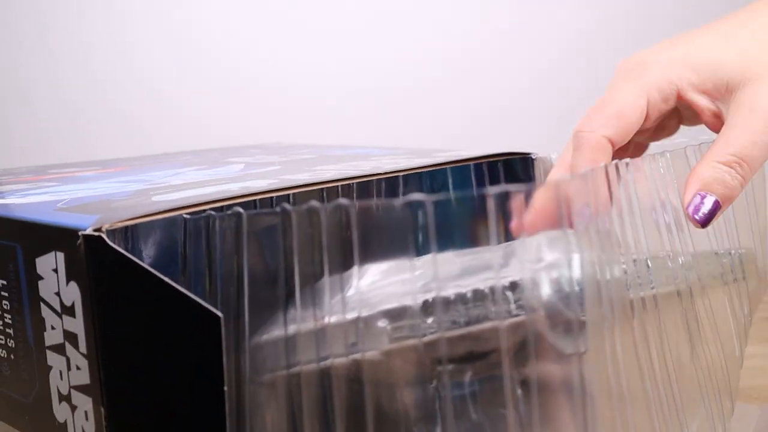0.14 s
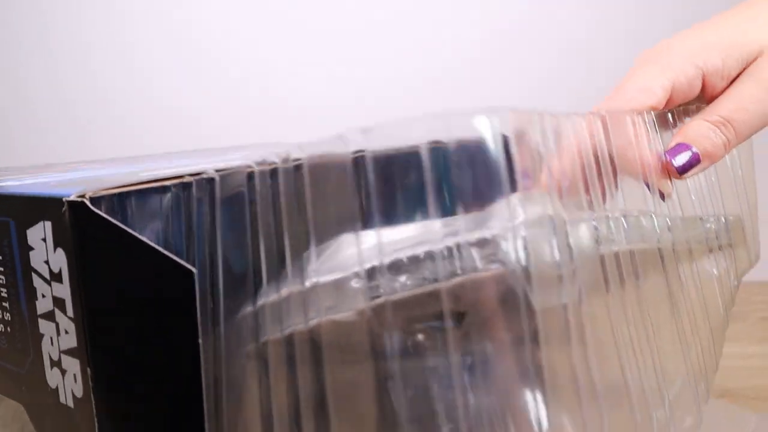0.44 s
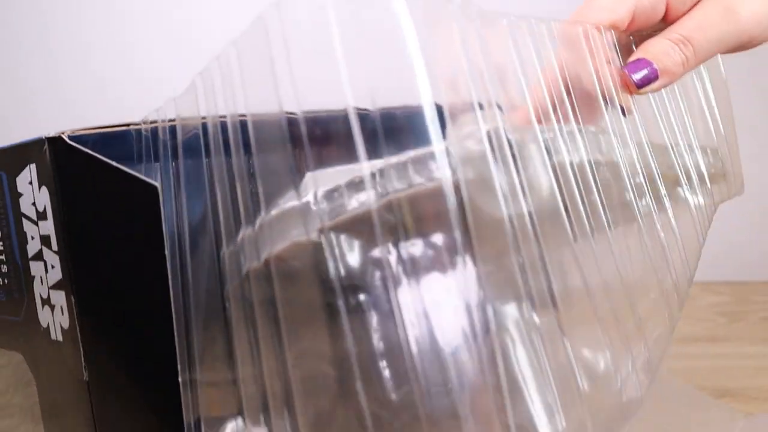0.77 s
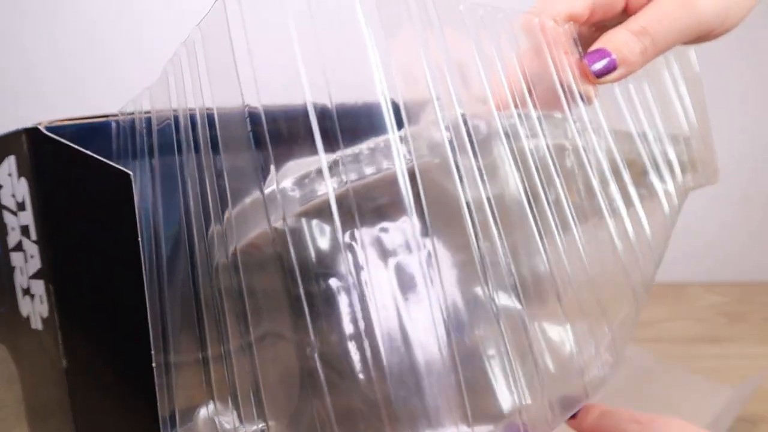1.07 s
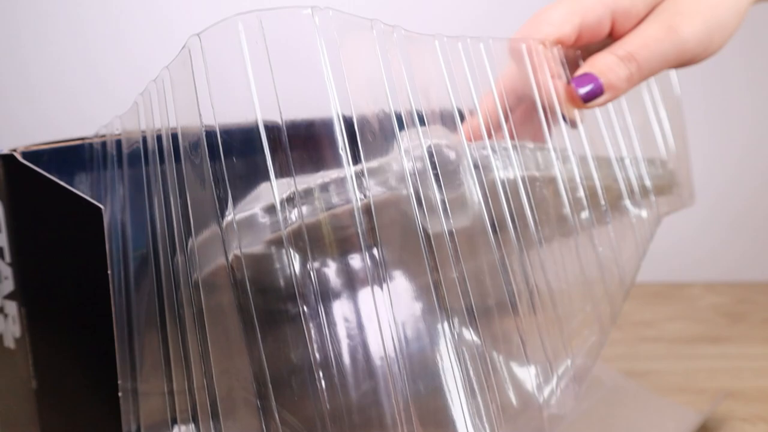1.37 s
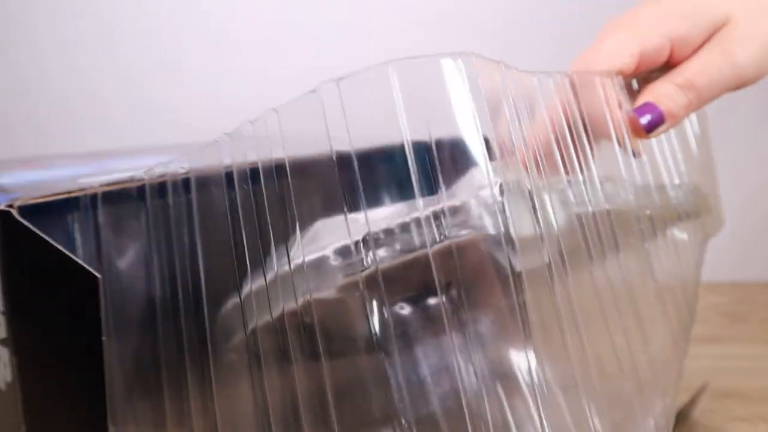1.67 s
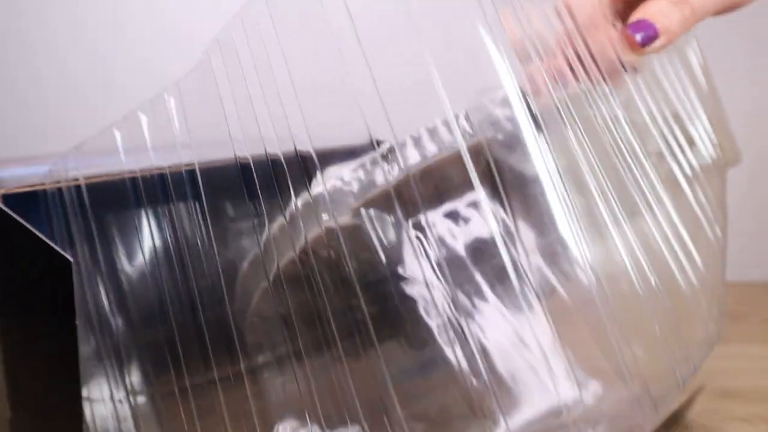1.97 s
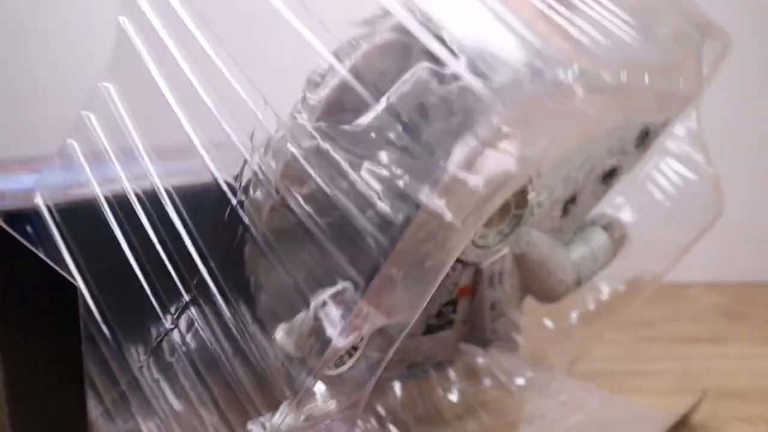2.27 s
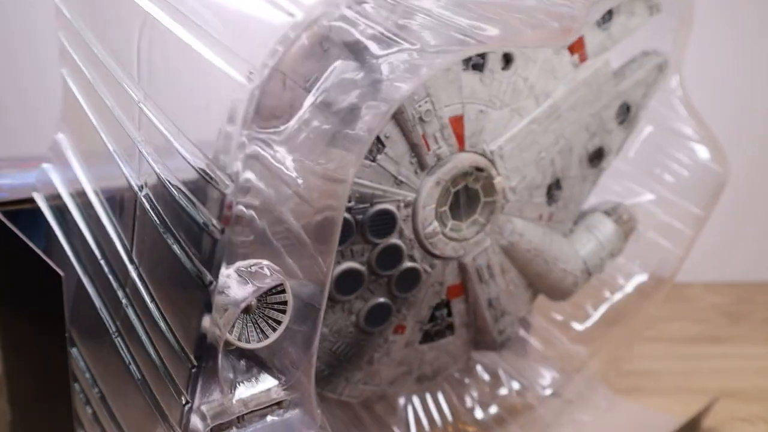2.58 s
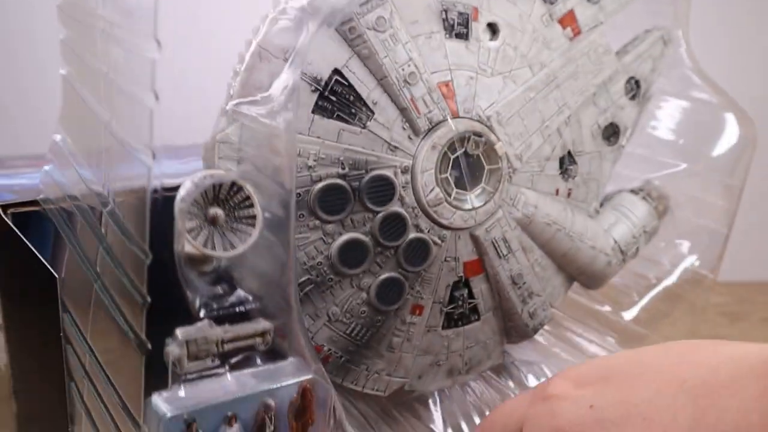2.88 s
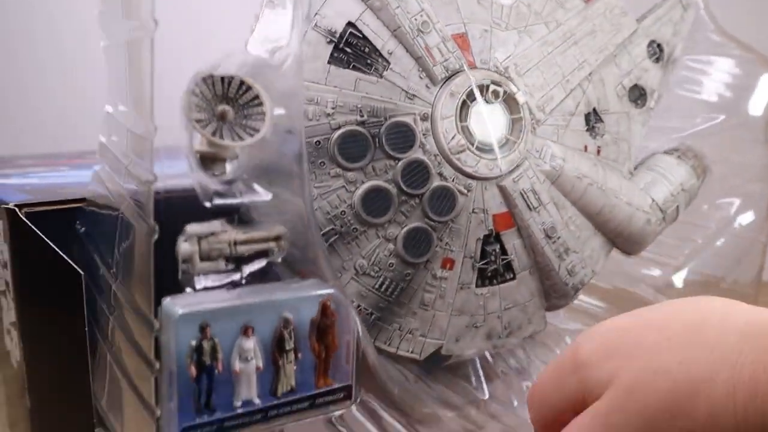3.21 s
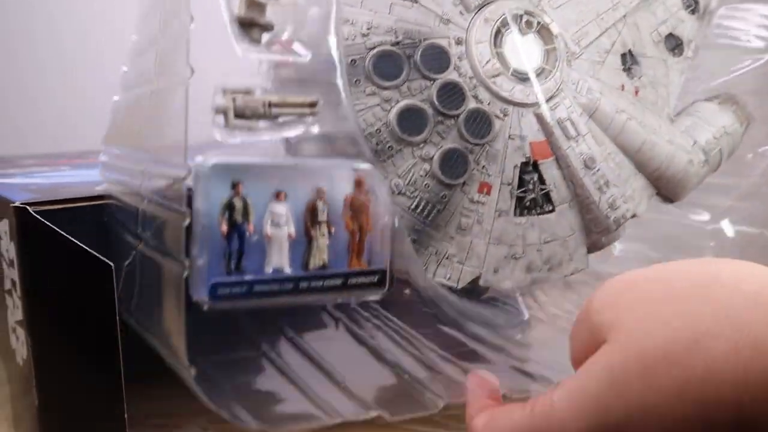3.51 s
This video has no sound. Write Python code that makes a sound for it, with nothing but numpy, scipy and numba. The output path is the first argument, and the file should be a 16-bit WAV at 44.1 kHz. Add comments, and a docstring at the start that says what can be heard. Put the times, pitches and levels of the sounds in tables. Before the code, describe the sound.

A thin plastic tray scrapes and snaps as it slides out of a cardboard box.

```python
"""In a small room, close by on a table, a thin plastic tray is pulled out of a cardboard box.
Its ribs snap and scrape over the card, exciting the modes of the shell; the film ticks, panels creak
and an edge zips. Stick-slip friction makes the box wall judder as the tray drags.
The tray tips out with dull bumps and a last loud clack."""
import sys
import numpy as np
from scipy import signal
from scipy.fft import rfft, irfft
from scipy.io import wavfile
from scipy.ndimage import map_coordinates
from numba import njit

SR = 44100
rng = np.random.default_rng(int(sys.argv[2]) if len(sys.argv) > 2 else 0)


def log_audio(samples):
    """Write samples as a 16-bit WAV file to the path given in sys.argv[1]."""
    # one column per channel
    frames = np.atleast_2d(samples).T
    # limit to full scale, then quantise
    limited = np.clip(frames, -1, 1)
    pcm = np.round(limited * 32767).astype(np.int16)
    wavfile.write(sys.argv[1], SR, pcm)


N = 160965


def undb(db):
    """Decibels to amplitude ratio."""
    return 10 ** (np.asarray(db) / 20)


def unit(x):
    """Normalisation to rms 1."""
    return x / np.sqrt(np.mean(x ** 2) + 1e-18)


def along(points, hz):
    """Interpolation of (Hz, value) points on a log-frequency axis."""
    f, v = np.array(points, float).T
    return np.interp(np.log(hz + 1), np.log(f), v)


def colour(x, *spectra, size=2048):
    """Minimum-phase filtering: the gains of cascaded (Hz, dB) spectra add."""
    hz = np.arange(size // 2 + 1) * SR / size
    cepstrum = irfft(np.log(undb(sum(along(s, hz) for s in spectra))))
    cepstrum[1:size // 2] *= 2
    cepstrum[size // 2 + 1:] = 0
    return signal.fftconvolve(x, irfft(np.exp(rfft(cepstrum))))


def add(out, start_s, x):
    """Superposition of a sound at its start time."""
    i = min(max(int(start_s * SR), 0), N)
    out[i:i + len(x)] += x[:N - i]


@njit
def resonate(x, hz, width_hz):
    """A driven, damped oscillator: a band-pass whose centre may move."""
    y, band_state, low_state = np.empty(len(x)), 0., 0.
    for i in range(len(x)):
        g, damping = np.tan(np.pi * hz[i] / SR), width_hz / hz[i]
        band = (band_state + g * (x[i] - low_state)) / (1 + g * (g + damping))
        band_state = 2 * band - band_state
        low_state += 2 * g * band
        y[i] = damping * band
    return y


def slips(per_s, spread_db, size):
    """Stick-slip friction: tiny jerks at random moments, a few larger than the rest."""
    when, strength, sign = rng.random((3, size))
    jerk_db = -spread_db * np.log(np.maximum(strength, .01))
    return unit((when < per_s / SR) * np.sign(sign - .5) * undb(jerk_db))


def burst(attack_s, fade_s, rough_db=2, size=8192):
    """Impact excitation: a flurry of tiny contacts that decays exponentially."""
    sign, strength = rng.standard_normal((2, size))
    t = np.arange(size) / SR
    envelope = np.minimum(t / attack_s, 1) * np.exp(-np.maximum(t - attack_s, 0) / fade_s)
    return unit(np.sign(sign) * undb(rough_db * strength)) * envelope


def stroke(length_s, attack_s, release_s, grip_db=1.07, grip_per_s=110, size=65536):
    """Sliding friction: dense slips, modulated in amplitude by an uneven grip."""
    t = np.arange(size) / SR
    grip = map_coordinates(rng.standard_normal(size=256), [t * grip_per_s], order=1, mode="mirror")
    attack = np.clip(t / attack_s, 0, 1) ** 2
    release = np.clip((length_s - t) / release_s + .5, 0, 1)
    return slips(per_s=2600, spread_db=2, size=size) * undb(grip_db * grip) * attack * release


# Spectrum of the background. Each row: frequency in Hz, relative level in dB.
HUSH_SPECTRUM = [(28, -44), (45, 4.5), (62, -6.5), (115, 1), (220, -6), (1400, -9.5), (6000, -19.5),
                 (9000, -30), (15500, -33.5)]

def hush():
    """Stationary noise: room tone and hiss."""
    return undb(-57.5) * unit(colour(rng.standard_normal(2 * N), HUSH_SPECTRUM, size=8192)[N:2 * N])


# Decay of the room. Each row: frequency in Hz, reverberation time in seconds.
REVERB_TIMES = [(100, 0.33), (700, 0.25), (2000, 0.17)]

def room(x, reverb_db=-9, build_s=0.018, size=32768, bands=14):
    """Reverberation: reflections build up and decay, the treble first."""
    t, hz = np.arange(size) / SR, np.arange(size // 2 + 1) * SR / size
    noise = rfft(rng.standard_normal(size))
    centres = np.geomspace(60, 16000, bands)
    tail = np.zeros(size)
    for centre, share in zip(centres, np.eye(bands)):
        band = irfft(noise * along(list(zip(centres, share)), hz))
        tail += band * undb(-60 * t / along(REVERB_TIMES, centre))
    tail *= np.minimum(t / build_s, 1) ** 2
    return x + undb(reverb_db) * signal.fftconvolve(x, tail / np.linalg.norm(tail))[:N]


# Course of the drag. Each row: time in seconds, relative level in dB, wall resonance in Hz.
DRAG_CURVE = [(1.55, -94, 390), (1.652, -34.5, 340), (1.82, -40.5, 346), (1.852, -27, 326),
              (1.915, -28, 386), (1.96, -38.5, 372), (2.03, -30.5, 393), (2.14, -31, 347),
              (2.46, -34.5, 305), (2.68, -67, 300)]

def wall_judder():
    """Forced vibration: slips drive the box wall, whose resonance shifts as it bends."""
    t = np.arange(N) / SR
    times, db, hz = np.array(DRAG_CURVE, float).T
    judder = slips(per_s=170, spread_db=0.77, size=N)
    for _ in range(2):
        judder = resonate(judder, np.interp(t, times, hz), width_hz=164.)
    return unit(judder) * undb(np.interp(t, times, db, left=-np.inf, right=-np.inf) - 3.5)


# Soft bumps against box and table. Each row: start in seconds, relative level in dB.
BUMP_EVENTS = [(0.261, -56), (2.146, -43), (2.503, -24), (3.282, -29.5), (3.323, -28), (3.599, -23.5)]
# Response of the box. Each row: frequency in Hz, gain in dB.
BOX_RESPONSE = [(42, -54), (105, -0.5), (135, 2), (230, -6), (1100, -59)]

def bumps(gain_db=18.5):
    """Cavity resonance: soft impacts boom in the box."""
    out = np.zeros(N)
    for start, db in BUMP_EVENTS:
        add(out, start, undb(gain_db + db) * colour(burst(attack_s=0.013, fade_s=0.051), BOX_RESPONSE))
    return out


# Catching panels. Each row: start and length in seconds, pitch in Hz, level in dB.
CREAK_EVENTS = [(0.082, 0.016, 1300, -38.5), (0.607, 0.019, 1300, -43), (1.884, .03, 783, -34.5),
                (1.987, 0.0257, 846, -34), (2.243, 0.024, 760, -30.5), (2.36, 0.062, 810, -31),
                (2.676, 0.016, 697, -41), (2.886, 0.063, 1300, -51), (2.979, 0.019, 750, -44.5),
                (3.242, 0.028, 837, -24.5)]

def creaks(overtone_ratio=1.843, overtone_db=-11.5):
    """Frictional excitation: a panel catches on the card and sings at its pitch and one overtone."""
    out = np.zeros(N)
    for start, length, hz, db in CREAK_EVENTS:
        force = stroke(length, attack_s=0.0015, release_s=0.0071)
        width_hz = 0.33 * hz
        for mode_hz, mode_db in ((hz, db), (hz * overtone_ratio, db + overtone_db)):
            centre = np.full(len(force), float(mode_hz))
            tone = resonate(resonate(force, centre, width_hz), centre, width_hz)
            add(out, start, undb(mode_db) * unit(tone) * np.sqrt(length * SR / len(tone)))
    return out


# Spectrum of the sliding edge. Each row: frequency in Hz, gain in dB.
ZIP_SPECTRUM = [(500, -36), (1700, -20), (2200, 7), (2750, -7), (3800, 1.5), (5300, -20), (6800, -11),
                (11000, -39)]

def edge_zip():
    """Friction noise: a plastic edge slides over card in one short, shrill zip."""
    out = np.zeros(N)
    force = stroke(length_s=0.015, attack_s=0.0046, release_s=0.007)
    add(out, start_s=1.113, x=undb(-21) * colour(force, ZIP_SPECTRUM))
    return out


# Response of the plastic to ticks, snaps and scrapes. Each row: frequency in Hz, gain in dB.
PLASTIC_RESPONSE = [(50, -25), (130, -17.5), (270, 2), (800, -4.5), (1750, -6), (3300, -9), (5800, -12),
                    (7400, -20), (8100, -27.5), (12000, -36), (15500, -52)]
# The clearest ticks. Each row: start in seconds, relative level in dB.
TICK_EVENTS = [(.675, -46), (1.033, -44), (1.367, -47.5), (2.415, -20), (2.698, -45.5), (2.717, -46.5),
               (2.922, -44.5), (3.018, -43.5)]

def crinkle():
    """Transients of flexure: the film ticks, faintly at random and a few times clearly."""
    tick = colour(burst(attack_s=0.0015, fade_s=0.0053), PLASTIC_RESPONSE, [(300, -11), (3000, -8)])
    jerks = slips(per_s=72, spread_db=1.5, size=N)
    out = undb(-65) * unit(signal.fftconvolve(jerks, tick)[:N])
    for start, db in TICK_EVENTS:
        add(out, start, undb(db) * tick / np.abs(tick).max() * 2)
    return out


# Centres in Hz of the shell's four registers: hollow, ring, clack and crack.
REGISTER_CENTRES = [350, 820, 1750, 4500]
# Modes of the shell. Each row: frequency in Hz, gain in dB, time to decay by 60 dB in seconds.
SHELL_MODES = [(349, -1, 0.049), (648.3, 3.5, 0.079), (751.7, 7.5, 0.17), (824.5, 5, 0.15), (1333, 2, 0.21),
               (1671, -1, 0.17)]

def shell(force, ring, hollow, clack, crack, flex_spread=0.0579):
    """Modal response: the place of contact weights the registers, and bending retunes each mode."""
    direct = colour(force, PLASTIC_RESPONSE, list(zip(REGISTER_CENTRES, (hollow, ring, clack, crack))))
    bends = np.exp(flex_spread * rng.standard_normal(len(SHELL_MODES)))
    ringing = np.zeros(len(direct))
    for (hz, db, t60), bend in zip(SHELL_MODES, bends):
        width_hz = np.log(1000) / np.pi / t60
        ringing += undb(db) * resonate(direct, np.full(len(direct), hz * bend), width_hz)
    return direct + ringing


# Rib snaps, and at 1.13 s the zipping edge letting go. Each row: start in seconds, then relative levels of
# ring, hollow, clack and crack in dB.
SNAP_EVENTS = [(0.037, -40, -46.5, -37, -45), (0.261, -30.5, -27.5, -26, -19.5),
               (0.268, -27, -34, -23, -58), (0.417, -44, -56, -44.5, -55), (0.469, -40.5, -55, -50, -56),
               (1.13, -46, -48, -31, -32), (1.411, -31.5, -32, -35.5, -49.5), (1.705, -20, -25, -13, -29),
               (2.386, -29, -37, -29, -22), (2.433, -17, -34, -16.5, -30),
               (2.516, -21.5, -12, -22.5, -36.5), (2.792, -33.5, -39, -50, -52.5),
               (3.046, -48, -33.5, -40.5, -38), (3.276, -18.5, -13.5, -20.5, -22.5),
               (3.356, -42, -21.5, -41, -35.5), (3.589, -7.5, -21.5, -5, -17), (3.596, -8, -9, -27, -15)]
# Rib scrapes. Each row: start and length in seconds, then the same four levels in dB.
SCRAPE_EVENTS = [(0, 0.24, -56, -60.5, -57.5, -74), (0.234, 0.03, -48, -45.5, -48, -53),
                 (0.612, .11, -46.5, -58, -55.5, -90), (0.599, 1, -67, -71.5, -70, -75),
                 (0.866, 0.11, -37.5, -55, -39, -52.5), (1.409, 0.084, -42.5, -48, -46.5, -78),
                 (1.517, 0.15, -38, -53, -47, -57), (1.607, 0.046, -33.5, -44, -34, -43),
                 (1.617, 0.22, -41.5, -41, -39.5, -53), (1.713, 0.024, -30.5, -30.5, -28, -36),
                 (1.861, 0.083, -38.5, -42.5, -39, -56), (2.107, 0.06, -39.5, -34.5, -44.5, -49.5),
                 (2.211, 0.13, -34, -64, -40.5, -50.5), (2.346, .076, -20.5, -31.5, -20, -27.5),
                 (2.418, 0.13, -29, -30, -34.5, -44.5), (2.538, 0.18, -42.5, -43.5, -50, -68),
                 (2.754, 0.49, -55.5, -61, -62.5, -69), (2.981, 0.11, -48, -52.5, -54.5, -58),
                 (3.213, 0.071, -36, -39, -41, -47), (3.282, 0.026, -23, -32.5, -24.5, -33.5),
                 (3.298, 0.085, -39, -43, -39, -51), (3.394, 0.13, -49, -44.5, -50.5, -71),
                 (3.573, 0.01, -23, -26.5, -19, -28.5), (3.605, 0.072, -34.5, -23.5, -33, -54)]

def tray_ribs(snap_db=15.5, scrape_db=16):
    """Impulsive and sustained excitation: ribs snap and scrape over the card, the zipping edge snaps free, and
    each rings the shell."""
    out = np.zeros(N)
    for start, *levels in SNAP_EVENTS:
        force = burst(attack_s=0.0015, fade_s=0.0071)
        add(out, start, undb(snap_db) * shell(force, *levels))
    for start, length, *levels in SCRAPE_EVENTS:
        force = stroke(length, attack_s=0.26 * length, release_s=0.022)
        add(out, start, undb(scrape_db) * shell(force, *levels))
    return out


def scene():
    """Superposition: tray and box reverberate in the room, over its hush."""
    return (hush() + room(tray_ribs() + creaks() + crinkle() + edge_zip() + wall_judder() + bumps()))[None]


def record(dry, ceiling=.92, top_hz=15800):
    """Soft saturation rounds the highest peak; a low-pass filter cuts the top."""
    rounded = dry / (1 + (dry / ceiling) ** 6) ** (1 / 6)
    return signal.sosfilt(signal.ellip(8, .2, 70, top_hz, fs=SR, output="sos"), rounded)


dry = scene()
out = record(dry)
log_audio(out)
```